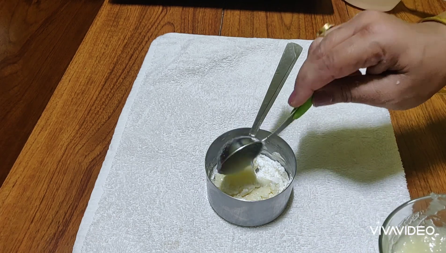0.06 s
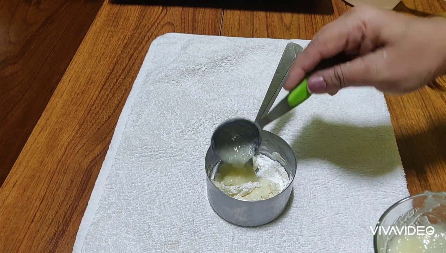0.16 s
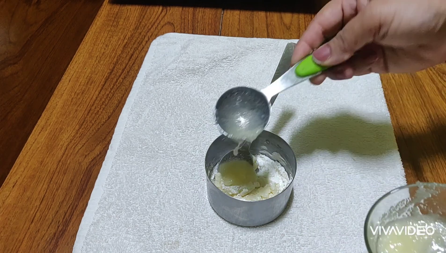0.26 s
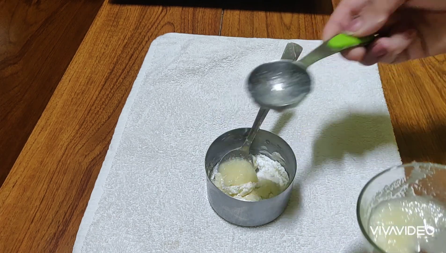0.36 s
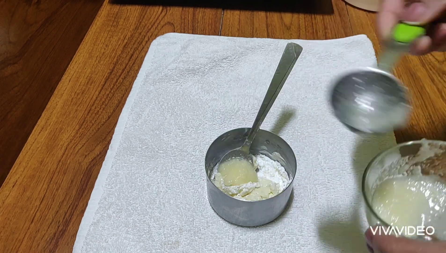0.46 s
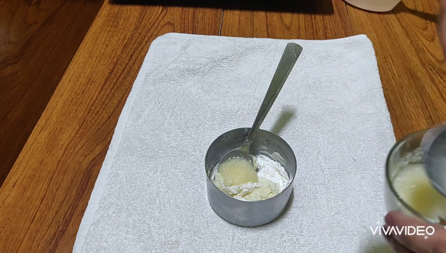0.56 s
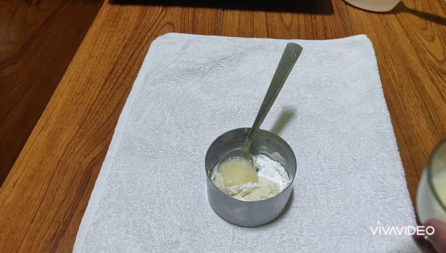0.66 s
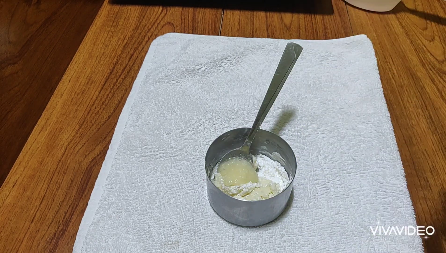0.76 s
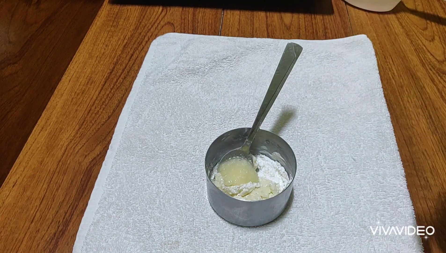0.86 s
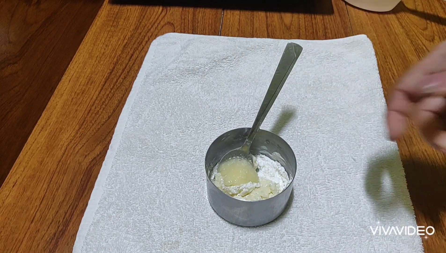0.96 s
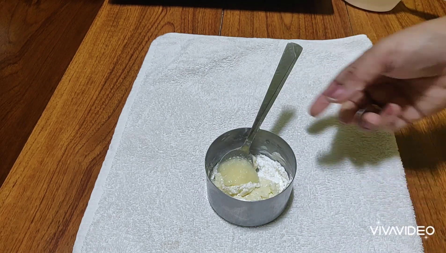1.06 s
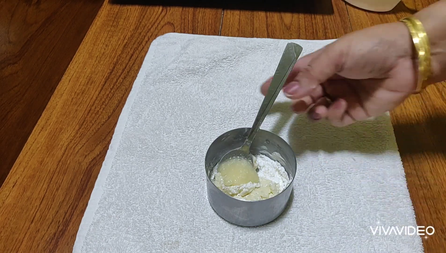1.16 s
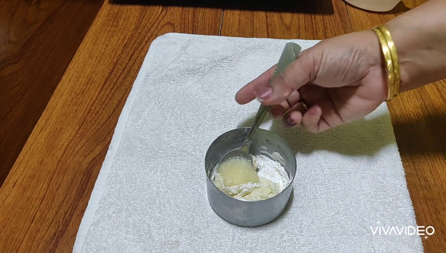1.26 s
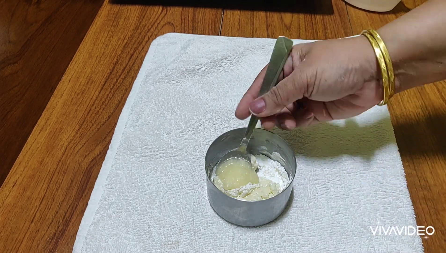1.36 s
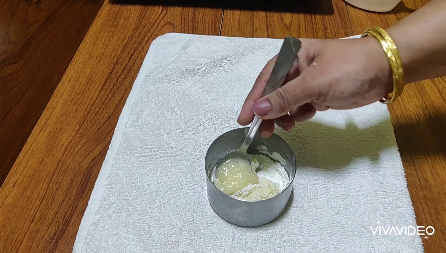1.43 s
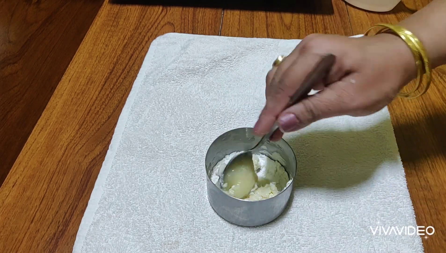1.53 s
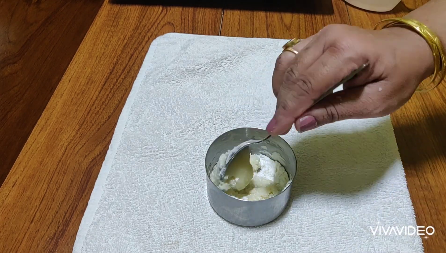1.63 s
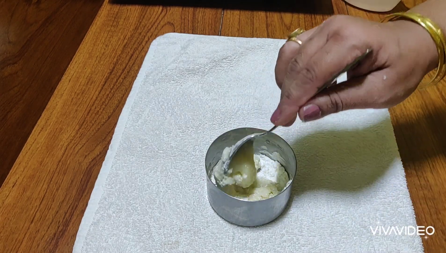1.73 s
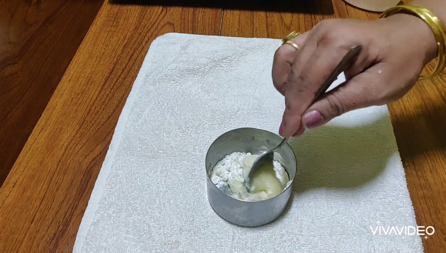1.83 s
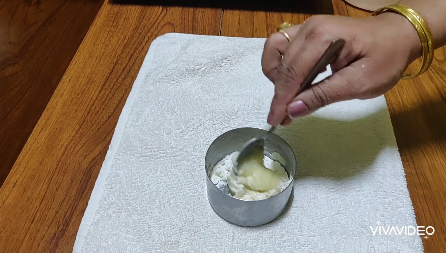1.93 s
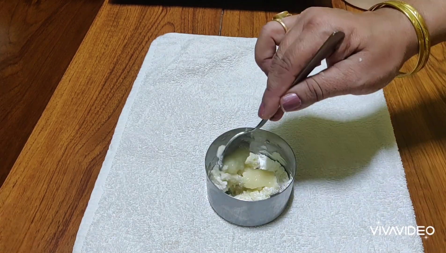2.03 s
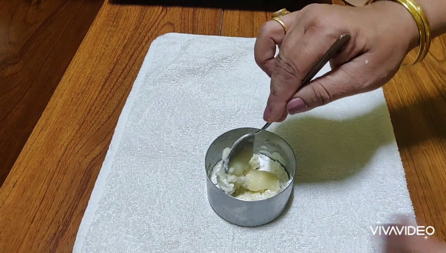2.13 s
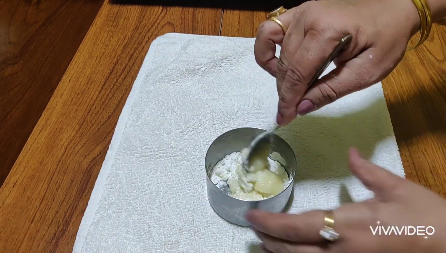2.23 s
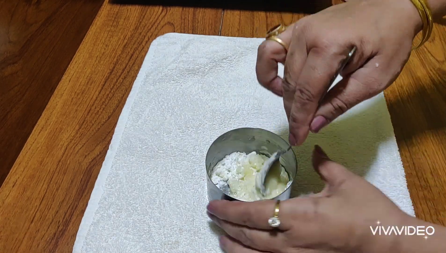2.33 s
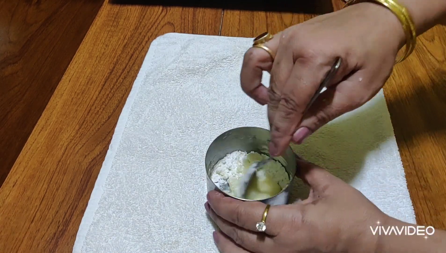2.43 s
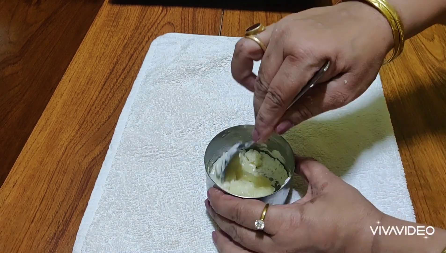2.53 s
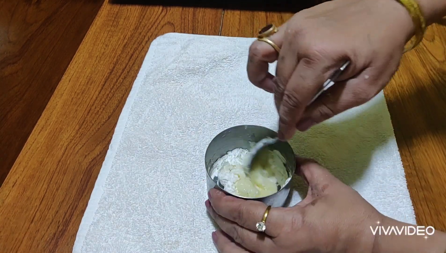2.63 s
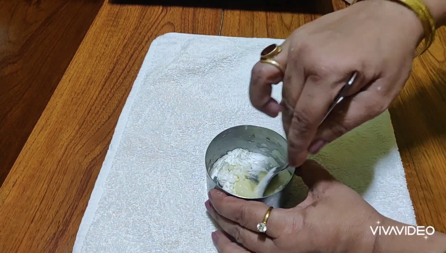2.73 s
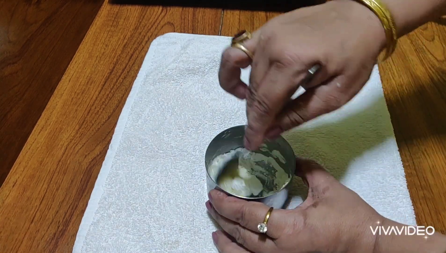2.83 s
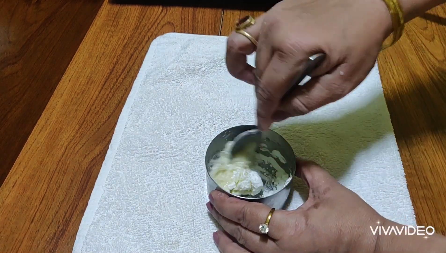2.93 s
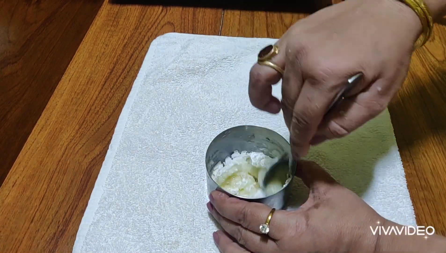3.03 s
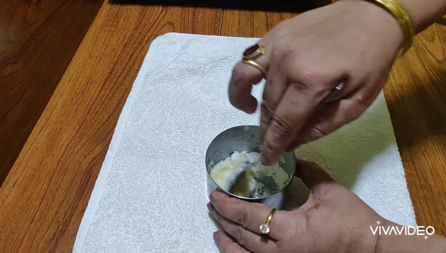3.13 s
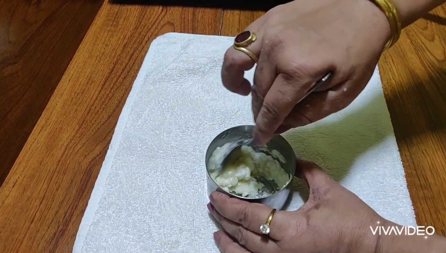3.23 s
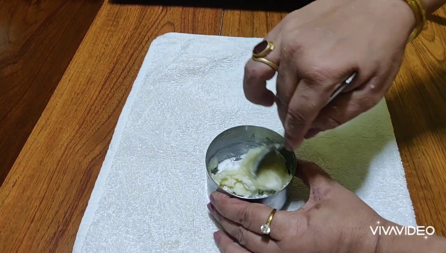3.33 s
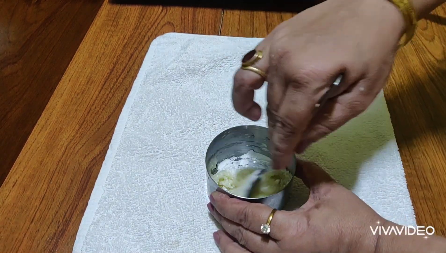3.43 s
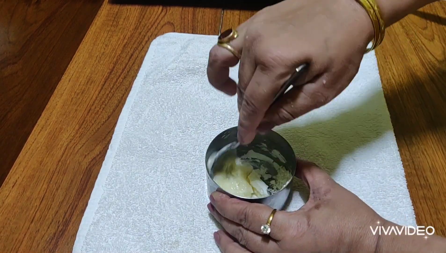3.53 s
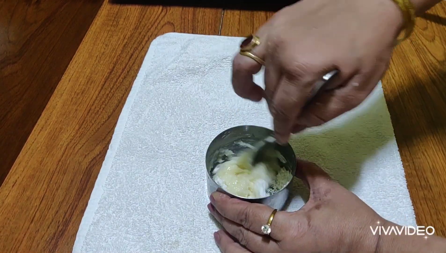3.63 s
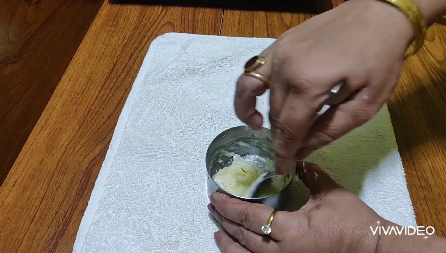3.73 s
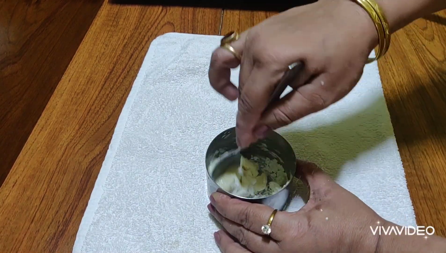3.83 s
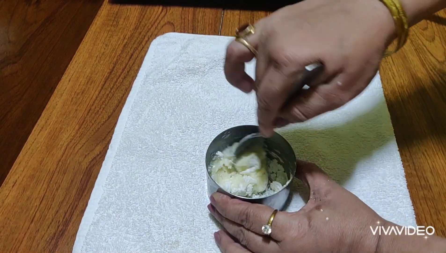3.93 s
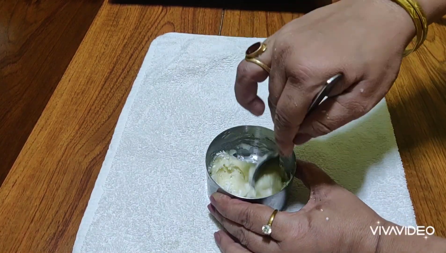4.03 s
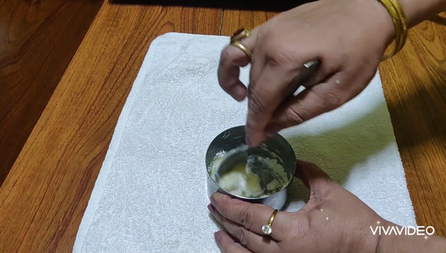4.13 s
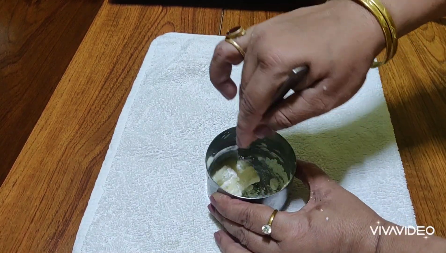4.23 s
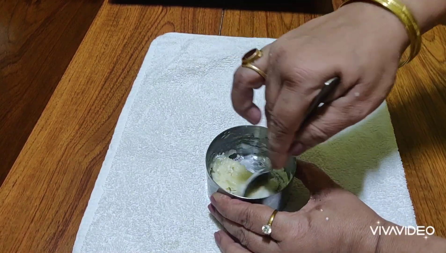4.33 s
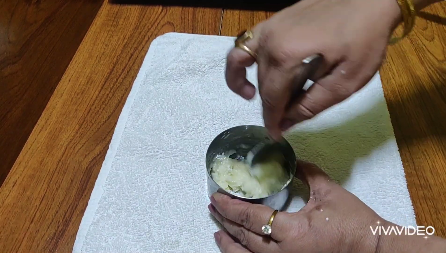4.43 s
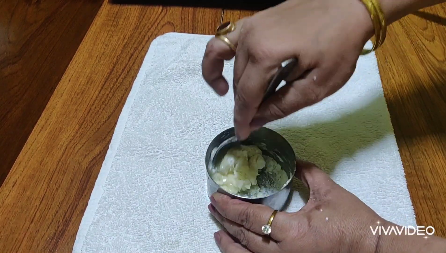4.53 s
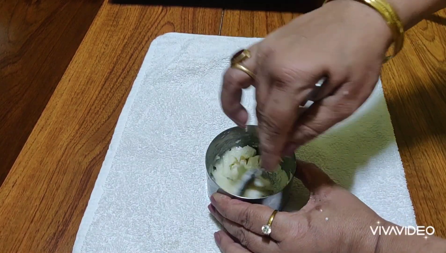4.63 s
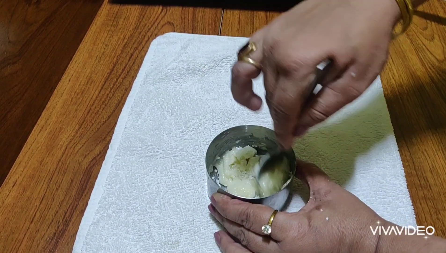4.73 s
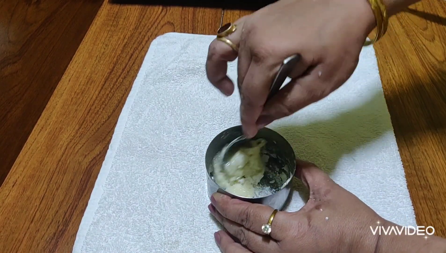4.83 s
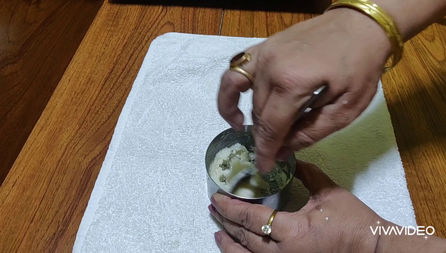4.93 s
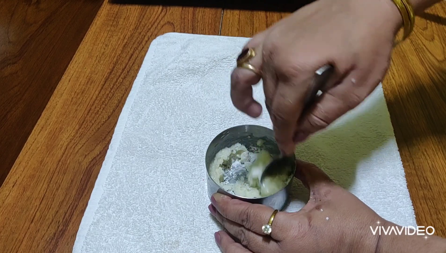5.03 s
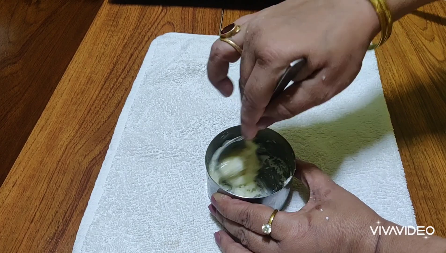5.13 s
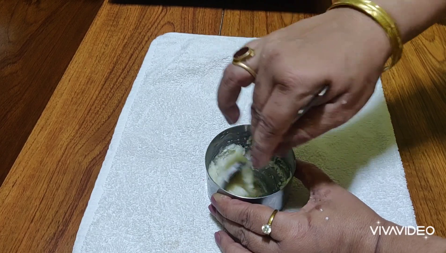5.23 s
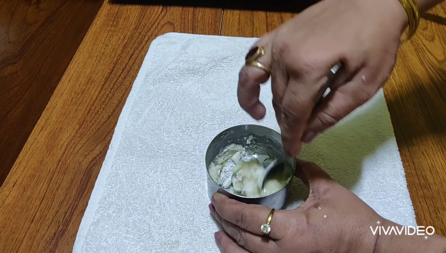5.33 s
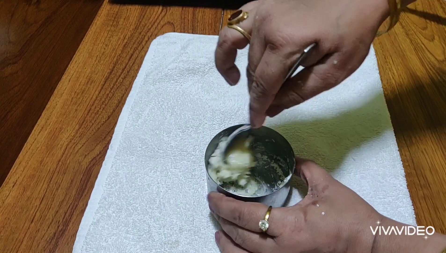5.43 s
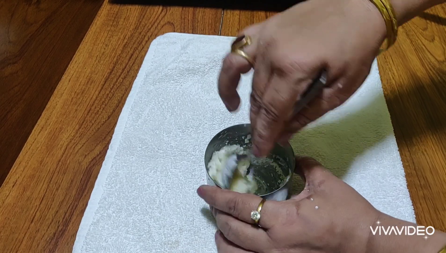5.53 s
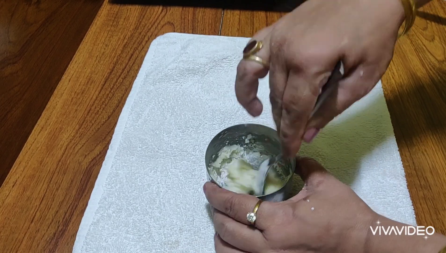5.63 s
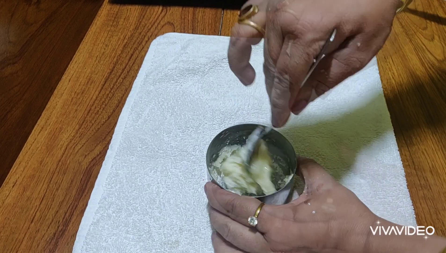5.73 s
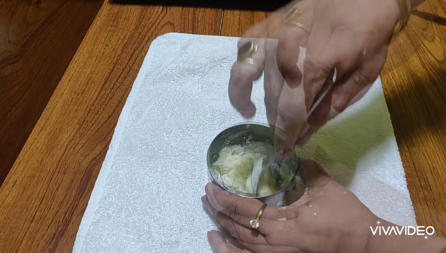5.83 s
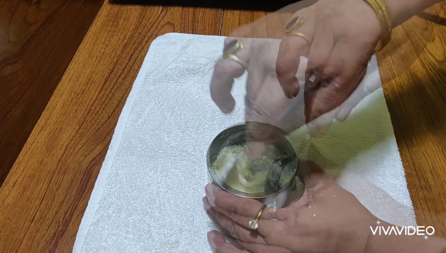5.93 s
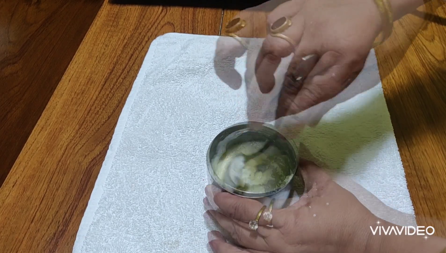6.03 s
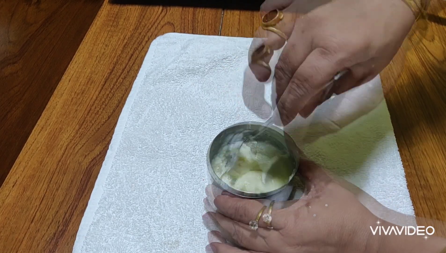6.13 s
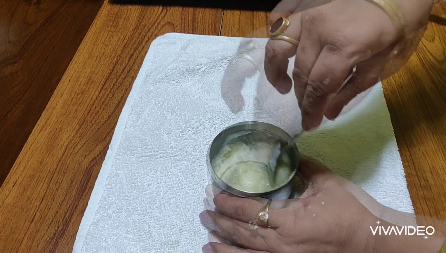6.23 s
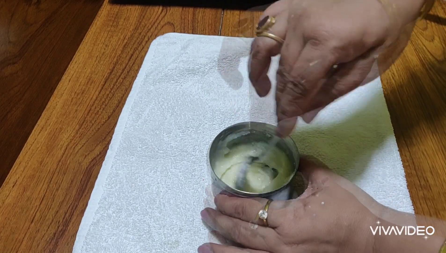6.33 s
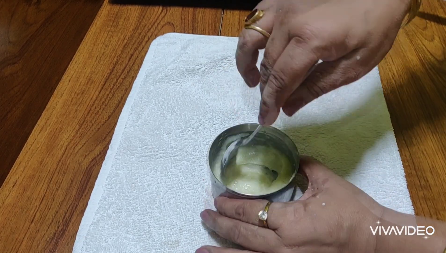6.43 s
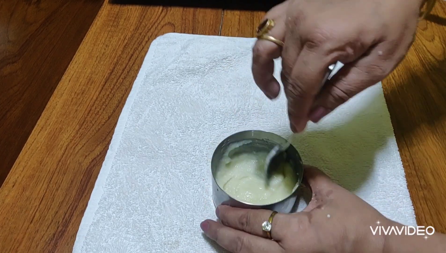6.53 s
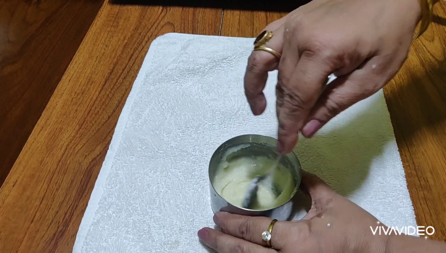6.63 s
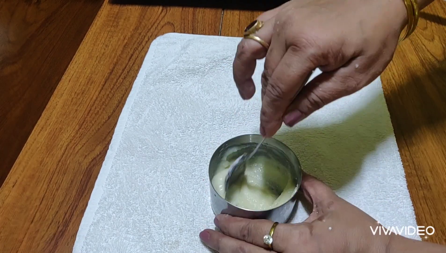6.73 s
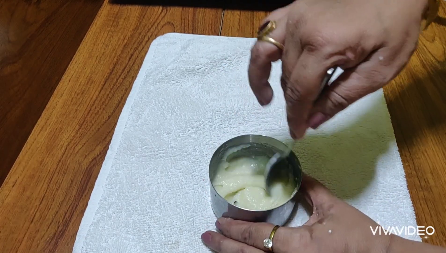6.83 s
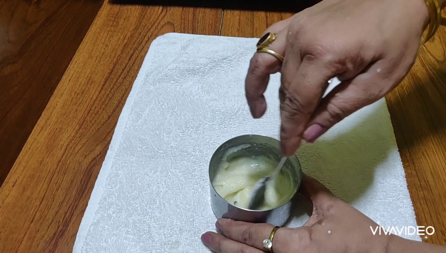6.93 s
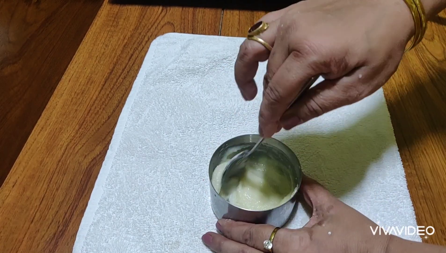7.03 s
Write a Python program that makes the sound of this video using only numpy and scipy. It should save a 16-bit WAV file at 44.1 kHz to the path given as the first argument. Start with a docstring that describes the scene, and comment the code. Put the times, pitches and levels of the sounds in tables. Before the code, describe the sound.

Low appliance hum, a bright glass clink and distant wooden bumps, then quick close spoon knocks and gritty scrapes inside a hand-damped steel bowl.

```python
"""Small, lively kitchen: a steel spoon stirs paste in a small steel bowl, held by hand on a towel on a wooden table.
An appliance and the room hum throughout, as low tones over filtered noise. First, decaying modes make small bright
clinks, a measuring spoon on glass and then probably bangles, and wooden modes thud across the room. Then, close to
the two-port microphone, the spoon knocks and scrapes round the damped bowl about three times a second: blows ring
steel, wall, rim, table and room, random slips scrape, short tones squeak and pop, and shaped noise rubs softly."""
import sys
import numpy as np
from scipy import signal
from scipy.fft import rfft, irfft, next_fast_len
from scipy.io import wavfile
from scipy.ndimage import map_coordinates

SR = 44100
rng = np.random.default_rng(int(sys.argv[2]) if len(sys.argv) > 2 else 0)


def dump_mix(stems):
    """Bounce the given channels to the path in sys.argv[1] as a 16-bit WAV at rate SR."""
    frames = np.atleast_2d(stems).T  # one column per channel
    limited = np.clip(frames, -1, 1)  # hard clip at full scale
    pcm = np.round(limited * 32767).astype(np.int16)
    wavfile.write(sys.argv[1], SR, pcm)


N = 311346


def amp(db):
    """Decibels to gain."""
    return 10 ** (np.asarray(db) / 20)


def unit(x):
    """Scale to rms 1."""
    return x / np.sqrt(np.mean(x ** 2) + 1e-20)


def along(points, hz):
    """(frequency, value) points read on a log frequency axis."""
    f, v = np.transpose(points)
    return np.interp(np.log(hz + 1), np.log(f + 1), v)


def wobble(rate, size=N):
    """A smooth random curve, rate knots a second."""
    knots = rng.standard_normal(int(size * rate / SR) + 4)
    return map_coordinates(knots, [np.arange(size) * rate / SR])


def filtered(x, response):
    """x times a response of frequency."""
    n = x.shape[-1]
    m = next_fast_len(n + SR // 4)
    return irfft(rfft(x, m) * response(np.fft.rfftfreq(m, 1 / SR)), m)[..., :n]


def coloured(x, points):
    """x shaped by this spectrum, rms 1."""
    return unit(filtered(x, lambda hz: amp(along(points, hz))))


def impulse(points, size=4096):
    """The causal (minimum-phase) pulse that has this spectrum, peak 1."""
    cepstrum = irfft(np.log(amp(along(points, np.fft.rfftfreq(size, 1 / SR)))))
    cepstrum[1:size // 2] *= 2
    cepstrum[size // 2 + 1:] = 0
    pulse = irfft(np.exp(rfft(cepstrum)))
    return pulse / np.abs(pulse).max()


def add(track, s, sound):
    """Mix a sound into the track at time s."""
    start = max(round(s * SR), 0)
    part = sound[..., :max(N - start, 0)]
    track[:, start:start + part.shape[-1]] += part


def ring(modes, t, detune, scatter_db, spread, attack):
    """Stereo ring, mid peak 1; every call gives the modes new strengths, pitches and directions."""
    hz, db, t60 = np.transpose(modes)[:, :, None]
    pitch, size, turn = rng.standard_normal((3, len(modes), 1))
    decay = amp(db + scatter_db * size - 60 * t / t60) * (1 - np.exp(-t / attack))
    phase = 2 * np.pi * hz * (1 + detune * pitch) * t
    pair = np.array([(decay * np.sin(phase + side * spread * turn)).sum(0) for side in (1, -1)])
    return pair / np.abs(pair.mean(0)).max()


def slips(t, rate, uneven_db):
    """Stick and slip: jolts at random moments, of uneven size and either sign."""
    chance, size = rng.random(len(t)), rng.standard_normal(len(t))
    return (chance < rate / SR) * amp(uneven_db * size) * np.sign(rng.standard_normal(len(t)))


def nearby(size, apart):
    """Noise from one near spot: one part reaches both ports, one part differs."""
    return unit(rng.standard_normal(size) + apart * rng.standard_normal((2, size)))


# how alike room sound is at the two ports: (frequency [Hz], left-right likeness [0-1])
PORT_LIKENESS = [(100, 0.9), (200, 1), (350, 0.11), (700, 0.037), (2000, 0.056), (8000, 0.039)]


def diffuse(size):
    """Noise from all sides: alike at both ports in the bass, nearly unrelated in the treble."""
    def mid_and_side(hz):
        turn = np.arccos(np.clip(along(PORT_LIKENESS, hz), -1, 1)) / 2
        return np.array([np.cos(turn), np.sin(turn)])
    mid, side = filtered(rng.standard_normal((2, size)), mid_and_side)
    return np.array([mid + side, mid - side])


# how long the kitchen rings: (frequency [Hz], t60 [s])
KITCHEN_DECAY = [(100, 0.96), (400, 0.78), (1200, 0.58), (3000, 0.52), (6500, 0.47), (10000, 0.38)]


def room(x, wet_db, rise):
    """Add the kitchen's answer, a decaying diffuse tail drawn afresh for each third of a second."""
    out, step = x.copy(), SR // 3
    for start in range(0, N, step):
        part = x[:, start:start + step]
        if part.any():
            hz, t, z = signal.stft(diffuse(2 * step), SR, nperseg=256)
            decay = amp(-60 * t / along(KITCHEN_DECAY, hz)[:, None]) * (1 - np.exp(-t / rise))
            tail = signal.istft(z * decay, SR, nperseg=256)[1]
            tail = amp(wet_db) * tail / np.linalg.norm(tail[0])
            add(out, start / SR, signal.fftconvolve(part, tail, axes=1))
    return out


# low hum, many tones at the room's own resonances: (frequency [Hz], level [dB])
HUM_TONES = [(45.8, -53), (110.5, -56.5), (166.9, -48), (236.9, -47.5), (333.8, -57.5), (436.0, -60),
             (486.2, -46.5), (532.9, -57), (748.3, -66)]
# the low rumble: (frequency [Hz], level [dB])
RUMBLE_COLOUR = [(32, -11), (45, 4), (66, -13.5), (108, -7), (130, -9.5), (163, -3), (200, -7.5),
                 (238, -0.5), (275, -12), (335, -13.5), (410, -17), (488, -13.5), (900, -25), (2000, -62)]
# the rush of air, also the colour of smeared paste: (frequency [Hz], level [dB])
HISS_COLOUR = [(500, 2.5), (900, 0), (1300, 0.5), (1750, -2.5), (2150, 2.5), (2700, -7), (4200, -6.5),
               (5600, -6), (6700, -5), (8000, -9), (9500, -10.5), (11500, -9.5)]
# the hiss rises over the first two seconds, then eases slightly: (time [s], level [dB])
HISS_LEVEL = [(0, -2), (2, 0.5), (2.6, -0.5)]
RUMBLE_DB, HISS_DB = -43, -53.5
HUM_DRIFT = 0.79  # scale of the random phase wander [rad]


def appliance():
    """Low hum of slightly unsteady tones, many at the room's own resonances, over rumble and a rush of air."""
    t, hum = np.arange(N) / SR, 0
    for hz, db in HUM_TONES:
        level = amp(db + 0.21 * wobble(3.9))
        hum = hum + level * np.sin(2 * np.pi * hz * t + HUM_DRIFT * wobble(2.514))
    rumble = amp(RUMBLE_DB) * coloured(diffuse(N), RUMBLE_COLOUR)
    hiss = amp(HISS_DB + np.interp(t, *np.transpose(HISS_LEVEL))) * coloured(diffuse(N), HISS_COLOUR)
    return hum + rumble + hiss


# small bright clinks, a measuring spoon on glass, then probably bangles at 1.2 s:
# (time [s], tick level [dB], clatter pitch [Hz], clatter re the tick [dB],
# clatter t60 [s], low knock level [dB], after-ring level [dB])
CLINK_EVENTS = [(0.056, -50, 6500, -3, .01, -75, -82), (0.2152, -45, 6900, -8, 0.015, -70, -79),
                (0.7831, -14.5, 2700, -21, 0.03, -35.5, -40.5), (0.829, -40.5, 5750, 3.5, 0.034, -60, -74),
                (0.9371, -28, 4800, 5, 0.014, -30, -62), (0.953, -26.5, 4760, 3.5, 0.023, -38, -58),
                (0.9549, -29.5, 5550, 7, 0.012, -38.5, -61), (0.9619, -32.5, 9340, 14, 0.01, -45, -64),
                (0.984, -41, 4700, 3, .009, -51, -70), (1.203, -38.5, 8150, 7.5, 0.041, -72, -74),
                (1.213, -46, 5300, 1, .02, -72, -75), (1.43, -48, 2300, 0, 0.046, -72, -80)]
# the tick, as of a measuring spoon on glass: (frequency [Hz], level [dB], t60 [s])
TICK_MODES = [(1290, -4, 0.011), (2000, 0, 0.0072), (2604, -7.5, 0.027), (3460, -8, .008), (5470, -7, 0.01),
              (7130, 0.5, 0.016), (7900, -2.5, 0.0085), (8560, -3.5, 0.021), (9160, 0, 0.027)]
# close partials round a clink's pitch: (frequency ratio, level [dB])
CLATTER_PARTIALS = [(0.946, -1.5), (1, 4), (1.07, -6.5), (1.17, -5.5)]
# the low knock, as of the glass on the table: (frequency [Hz], level [dB], t60 [s])
LOW_KNOCK_MODES = [(500, -9, 0.025), (780, 2, 0.014)]
# the after-ring, as of the measuring spoon: (frequency [Hz], level [dB], t60 [s])
AFTER_RING_MODES = [(2700, -6, 0.6), (2735, -5, 0.56), (5600, -16, 0.25), (8110, -19, .2),
                    (9290, -16, 0.16)]


def clinks():
    """Small bright clinks: each a tick, a clatter of close partials, a low knock and a thin after-ring."""
    ticks, rings, t = np.zeros((2, N)), np.zeros((2, N)), np.arange(SR // 2) / SR
    short = t[:SR // 12]
    for s, db, hz, clatter_db, t60, knock_db, after_db in CLINK_EVENTS:
        tick = ring(TICK_MODES, short, detune=0.008, scatter_db=2.5, spread=0.8, attack=0.0001)
        crack = 0.28 * amp(-60 * short / 0.025) * rng.standard_normal((2, len(short)))
        partials = [(ratio * hz, level, t60) for ratio, level in CLATTER_PARTIALS]
        clatter = ring(partials, short, detune=.006, scatter_db=1.5, spread=.5, attack=.0002)
        knock = ring(LOW_KNOCK_MODES, short, detune=.04, scatter_db=2, spread=.4, attack=.0012)
        after = ring(AFTER_RING_MODES, t, detune=.0004, scatter_db=1, spread=.4, attack=.004)
        add(ticks, s, amp(db) * (tick + crack + amp(clatter_db) * clatter) + amp(knock_db) * knock)
        add(rings, s, amp(after_db) * after)
    return room(ticks, wet_db=-8.5, rise=0.0031) + room(rings, wet_db=-14, rise=0.0063)


# thuds across the room: (time [s], level [dB])
THUD_EVENTS = [(1.5953, -9), (1.6365, -33), (1.7115, -26.5), (1.7837, -18.5)]
# the landing weight: (frequency [Hz], level [dB])
WEIGHT_COLOUR = [(29, -77), (50, -43), (100, -5), (158, 6), (252, -8.5), (439, -3), (699, -7), (1000, -16),
                 (1900, -30), (3600, -51), (10000, -60), (22000, -120)]
# what thuds: (frequency [Hz], level [dB], t60 [s])
WOOD_MODES = [(325, -2, 0.019), (512, 1, 0.042), (667, 5, 0.03), (884, -4, 0.013), (1215, 4, 0.016),
              (1830, -4.5, 0.014), (2750, -23, .008)]
# the rattle after it: (frequency [Hz], level [dB])
RATTLE_COLOUR = [(100, -28), (200, -12), (450, 7), (650, 5), (850, 0.5), (1400, -6.5), (2400, -12.5),
                 (3400, -20), (6000, -42)]
# the thud's crack: (frequency [Hz], level [dB])
CRACK_COLOUR = [(1000, -27), (3800, -14), (6400, 4.5), (8000, -14), (9300, -0.5), (12000, -38)]
WEIGHT_LAG_S = 0.0017  # the weight lands after the edge
RATTLE_DB, RATTLE_T60_S = -22, 0.4


def thuds():
    """Something heavy and wooden bumps: its edge knocks and cracks, its weight lands, it rattles densely."""
    body, cracks, pulse = np.zeros((2, N)), np.zeros((2, N)), impulse(WEIGHT_COLOUR)
    t = np.arange(SR // 3) / SR
    for s, db in THUD_EVENTS:
        knock = ring(WOOD_MODES, t, detune=.03, scatter_db=1.5, spread=.4, attack=.0001)
        jolts = slips(t, rate=720, uneven_db=1.5)
        rattle = coloured(jolts * nearby(len(t), apart=0.8), RATTLE_COLOUR)
        rattle = amp(RATTLE_DB - 60 * t / RATTLE_T60_S) * rattle
        add(body, s, amp(db) * (rattle - knock))
        add(body, s + WEIGHT_LAG_S, amp(db) * pulse)
        crack = coloured(rng.standard_normal((2, len(t))), CRACK_COLOUR)
        add(cracks, s, amp(db - 22.5 - 60 * t / 0.039) * crack)
    return room(body, wet_db=-1.5, rise=0.0013) + room(cracks, wet_db=-6, rise=0.004)


# skin on towel: (frequency [Hz], level [dB])
TOWEL_COLOUR = [(2000, -10.5), (4900, -8), (6300, -2), (9200, -3), (11000, -13)]
BRUSH_S, BRUSH_WIDTH_S = 2.427, 0.084  # its height, and the time from there to half its amplitude
BRUSH_DB, BRUSH_SWING_DB = -46, 0.6


def brush():
    """Skin slides unevenly over cloth, swelling and fading as the hand closes round the bowl."""
    away = (np.arange(N) / SR - BRUSH_S) / BRUSH_WIDTH_S
    level = amp(BRUSH_DB + BRUSH_SWING_DB * wobble(60)) / (1 + away ** 2)
    return level * coloured(rng.standard_normal((2, N)), TOWEL_COLOUR)


def gripped(modes, detune, scatter_db):
    """The modes as one stroke finds them: damped by pressure, shifted and weighted by where the edge sits."""
    pitch, size = rng.standard_normal((2, len(modes)))
    hz, db, t60 = np.transpose(modes)
    return np.column_stack([hz * (1 + detune * pitch), db + scatter_db * size, t60 * PRESSED_DAMPING])


def shaken(jolts, modes, detune, scatter_db, spread):
    """Jolts through the modes, rms 1; the contact point travels, so the ring is redrawn every 10 ms."""
    step, t = SR // 100, np.arange(SR // 55) / SR
    out = np.zeros((2, len(jolts) + step + len(t)))
    for start in range(0, len(jolts), step):
        body = ring(modes, t, detune, scatter_db, spread, attack=0.00061)
        piece = signal.fftconvolve(jolts[None, start:start + step], unit(body), axes=1)
        out[:, start:start + piece.shape[1]] += piece
    return unit(out[:, :len(jolts)])


# the spoon drags along the wall: (time [s], pressing [s], easing [s], rasp level [dB],
# bite: lift of the lower steel modes re the rasp [dB], wall level [dB])
STROKE_EVENTS = [(2.773, 0.016, 0.017, -35, 0, -39), (2.809, 0.042, 0.0048, -37, -3, -57),
                 (2.852, 0.0027, 0.025, -27, -13, -46), (3.139, 0.059, 0.0051, -25, -3.5, -32.5),
                 (3.447, 0.024, 0.043, -31, -1, -35), (3.497, 0.019, 0.043, -32, -3, -39),
                 (3.774, 0.025, 0.012, -27, -4, -34.5), (3.802, 0.019, 0.048, -23.5, -5.5, -40),
                 (3.87, 0.056, 0.024, -34, -3.5, -44), (4.127, 0.049, 0.0078, -27, -1, -31.5),
                 (4.626, 0.0089, 0.0095, -44.5, -3.5, -48.5), (4.803, 0.0084, 0.045, -32, -8, -42),
                 (4.866, 0.011, 0.034, -41, -7.5, -54), (4.993, 0.029, 0.027, -40, -8, -34),
                 (5.025, 0.019, 0.0073, -33, -9, -41), (5.048, 0.059, 0.042, -25.5, -5.5, -35.5),
                 (5.365, 0.03, 0.0065, -33, -4.5, -43), (5.398, .012, 0.051, -24.5, -5, -34.5),
                 (5.711, 0.0096, .022, -39, -4.5, -42), (6.017, 0.02, 0.0039, -35.5, -3, -39),
                 (6.057, 0.012, 0.03, -36, -6, -47), (6.226, 0.0095, 0.015, -38.5, -12, -47),
                 (6.277, 0.004, 0.027, -34.5, -4.5, -50), (6.566, .016, 0.022, -34.5, -13.5, -52),
                 (6.645, 0.026, 0.025, -40.5, -1, -36), (6.82, 0.032, 0.021, -34.5, -5, -43),
                 (6.989, 0.0069, 0.04, -35, -1.5, -42.5)]
# the bowl, damped by hand and paste: (frequency [Hz], level [dB], t60 [s])
STEEL_MODES = [(1637, -16.5, 0.079), (1720, -7, 0.051), (2020, -4, 0.008), (2420, 4.5, 0.017),
               (2928, 2, 0.027), (3405, 5.5, 0.011), (4120, 3.5, 0.019), (4330, 0, 0.01),
               (4930, -7.5, 0.016), (5265, 9, 0.014), (5750, 4, 0.0077), (5885, 6, 0.019), (6385, 5, 0.015),
               (6480, 4.5, 0.016), (6940, 1.5, 0.024), (7290, -4.5, 0.03), (7700, -3, 0.019),
               (8680, 0.5, 0.0096), (9160, -1, 0.021)]
# the bowl's wall: (frequency [Hz], level [dB], t60 [s])
WALL_MODES = [(850, -4, 0.003), (1142, 4.5, 0.022), (1330, -5.5, 0.033), (1940, -3, 0.0077)]
# crushed grit: (frequency [Hz], level [dB])
GRIT_COLOUR = [(500, -50), (1000, -5), (1600, 3.5), (2400, 12.5), (3300, 5), (4400, 4.5), (5300, -9),
               (6400, 5), (7200, 3), (8200, -3), (9400, 0.5), (12000, -45)]
PRESS_DB, EASE_DB, TOUCH_S = 10, 8, 0.0044  # a stroke swells, then sinks; its edge lands and lifts in this time
BITE_FOLLOWS, WALL_FOLLOWS = 0.91, 0.51  # share of the swell in lower modes and wall: harder is brighter
CATCH_DB, CATCH_RATE = 2.2, 220  # the edge's unsteadiness: scale, and knots a second
SLIP_RATE, GRIT_DB = 2400, -3  # mean slips a second; grit re the steel's ring
PRESSED_DAMPING = 0.68  # share of the ring time left under pressure


def scrapes():
    """Each stroke presses, then eases; the edge's slips ring the damped steel and wall and crush grit."""
    out, crush = np.zeros((2, N)), amp(-60 * np.arange(SR // 100) / SR / 0.0016)
    for s, press_s, ease_s, rasp_db, bite_db, wall_db in STROKE_EVENTS:
        t = np.arange(0, press_s + ease_s + TOUCH_S, 1 / SR)
        force_db = np.interp(t, [0, press_s, press_s + ease_s], [-PRESS_DB, 0, -EASE_DB])
        contact = np.clip(np.minimum(t, t[-1] - t) / TOUCH_S, 0, 1)
        force_db = force_db + CATCH_DB * wobble(CATCH_RATE, size=len(t))  # the edge catches and frees itself
        jolts = slips(t, rate=SLIP_RATE, uneven_db=4)
        pressed = gripped(STEEL_MODES, detune=.035, scatter_db=1.5)
        steel = shaken(jolts, pressed, detune=.07, scatter_db=3.5, spread=.7)
        crushing = np.convolve(np.abs(jolts), crush)[:len(t)]
        steel += amp(GRIT_DB) * coloured(crushing * nearby(len(t), apart=0.5), GRIT_COLOUR)
        lower = filtered(steel, lambda hz: 1 / (1 + (hz / 4200) ** 8))
        rasp = amp(force_db) * unit(steel - lower)
        bite = amp(bite_db + BITE_FOLLOWS * force_db) * unit(lower)
        wall = shaken(jolts, WALL_MODES, detune=0.12, scatter_db=5, spread=0.7)
        wall = amp(wall_db + WALL_FOLLOWS * force_db) * wall
        add(out, s, contact * (amp(rasp_db) * (rasp + bite) + wall))
    return out


# spoon meets bowl: (time [s], steel clack level [dB], dull wall knock level [dB], wall pitch [Hz],
# low thump level [dB])
TAP_EVENTS = [(2.7804, -28.5, -26, 1310, -36), (2.859, -15, -51, 1430, -57),
              (3.1315, -14, -10.5, 1020, -25.5), (3.162, -32, -22.5, 1222, -41),
              (3.1958, -22, -37, 1060, -30), (3.7715, -32, -25, 1040, -32.5),
              (4.108, -28.5, -11.5, 1055, -21.5), (4.172, -36, -26, 1080, -33),
              (4.700, -36, -13.5, 1118, -22.5), (4.7282, -30.5, -25, 1183, -55),
              (4.811, -29, -49, 1360, -27), (4.992, -28.5, -25, 1270, -31), (5.016, -28, -23.5, 1377, -46),
              (5.046, -18.5, -17, 1474, -53), (5.0901, -25, -24.5, 1400, -37),
              (5.3367, -31.5, -30, 1042, -25.5), (5.3555, -25, -22, 1314, -30),
              (5.4053, -15, -31, 1571, -48), (5.436, -21, -25, 1220, -57), (5.7068, -35, -9.5, 1090, -30.5),
              (6.0085, -19, -12.5, 1310, -28.5), (6.2227, -22.5, -31.5, 1937, -43),
              (6.274, -19.5, -16, 1104, -32), (6.31, -23.5, -30, 1759, -57),
              (6.5595, -34, -26.5, 1041, -38), (6.6141, -6.5, -11.5, 1680, -36),
              (6.6606, -40, -24, 1502, -51), (6.673, -26.5, -41, 1361, -53),
              (6.8228, -37, -23.5, 1460, -61), (6.9916, -28, -28, 940, -37)]
REBOUND_S, REBOUND_DB = 0.0024, -1  # the edge chatters once as it lands


def clacks():
    """Bare steel on steel: a crack and a very short, dense ring, struck again as the edge rebounds."""
    out, t = np.zeros((2, N)), np.arange(SR // 20) / SR
    for s, clack_db, *_ in TAP_EVENTS:
        for lag, db in [(0, clack_db), (REBOUND_S, clack_db + REBOUND_DB)]:
            steel = ring(STEEL_MODES, t, detune=.012, scatter_db=2, spread=.6, attack=.0004)
            crack = 0.21 * amp(-60 * t / 0.039) * rng.standard_normal((2, len(t)))
            add(out, s + lag, amp(db) * (steel + crack))
    return out


# hard surfaces close by answer a knock: (delay [s], level [dB])
NEAR_ECHOES = [(0.0117, -11.5), (0.0163, -22)]
SMOTHER_S, WALL_LOW_HZ = .0042, 670  # paste smothers the wall; the small wall radiates little below this


def knocks():
    """A blow cushioned by paste knocks the wall for a few cycles; surfaces close by throw it back."""
    out, t = np.zeros((2, N)), np.arange(SR // 20) / SR
    thin = signal.butter(3, WALL_LOW_HZ, "high", fs=SR, output="sos")
    for s, _, knock_db, wall_hz, _ in TAP_EVENTS:
        stiffness = wall_hz / WALL_MODES[1][0]  # the wall sounds higher where it is struck near the base
        wall = ring(WALL_MODES, t * stiffness, detune=0.02, scatter_db=1.5, spread=0.42, attack=0.00062)
        smothered = wall / (1 + (t / SMOTHER_S) ** 4)
        knock = amp(knock_db) * signal.sosfilt(thin, smothered)
        add(out, s, knock)
        for delay, echo_db in NEAR_ECHOES:
            add(out, s + delay, amp(echo_db) * knock)
    return out


# the bowl's rim: (frequency [Hz], level [dB], t60 [s])
RIM_MODES = [(1060, 7, 0.33), (1070, -11, 0.8), (1220, -2.5, 0.34), (1330, -13, 0.13), (1530, 5, 0.25)]
RIM_DB, RIM_MUTE_DB = -24.5, 15  # after-ring re the knock; the most that bare steel against it takes away
RIM_FOCUS_DB = 25  # loss per octave from the wall's pitch
RIM_SAG, RIM_SAG_S = 0.033, 0.029  # starts sharp by this share, settling with this time constant
GRIP_MUTE_DB = 4.5  # what the hand's grip takes from the rim, except while it loosens
LOOSE_FROM_S, LOOSE_TO_S = 5.5, 5.9


def rim():
    """The rim sings on near the knock's pitch, sagging as the spoon eases off; bare steel and hand mute it."""
    out, t = np.zeros((2, N)), np.arange(SR // 2) / SR
    settling = t + RIM_SAG * RIM_SAG_S * (1 - np.exp(-t / RIM_SAG_S))
    for s, clack_db, knock_db, wall_hz, _ in TAP_EVENTS:
        song = 0
        for hz, db, t60 in RIM_MODES:
            mode_db = db - RIM_FOCUS_DB * abs(np.log2(hz / wall_hz)) - 60 * t / t60
            song = song + amp(mode_db) * np.sin(2 * np.pi * hz * settling)
        bare = amp(clack_db) / (amp(clack_db) + amp(knock_db))
        held = not LOOSE_FROM_S < s < LOOSE_TO_S
        add(out, s, amp(knock_db + RIM_DB - RIM_MUTE_DB * bare - GRIP_MUTE_DB * held) * song)
    return out


# a short table ring near 86 Hz and a longer room resonance near 111 Hz: (frequency [Hz], level [dB], t60 [s])
THUMP_MODES = [(86, 8, 0.16), (103.5, -14, 0.45), (111.8, -3.5, 1)]


def thumps():
    """The low thump of each tap: a short table ring near 86 Hz and a longer room resonance near 111 Hz."""
    out, t = np.zeros((2, N)), np.arange(2 * SR // 3) / SR
    for s, *_, thump_db in TAP_EVENTS:
        thump = ring(THUMP_MODES, t, detune=.008, scatter_db=1.5, spread=.03, attack=.0025)
        add(out, s, amp(thump_db) * thump)
    return out


# paste smears under the spoon: (time [s], length [s], level [dB])
SMEAR_EVENTS = [(2.8, 2.9, -53), (6.0, 1.2, -52.5)]
# the bowl shifts on the towel: (time [s], length [s], level [dB])
SHIFT_EVENTS = [(3.62, 0.3876, -46), (6.5, 0.7, -43.5)]
# the bowl's base on cloth: (frequency [Hz], level [dB])
CLOTH_COLOUR = [(100, -6), (220, -17), (330, -3), (600, -6.5), (900, -19.5), (2000, -17.5), (5000, -39)]
RUB_FADE_S, RUB_SWING_DB = 0.067, 1  # fade in and out; scale of the wavering


def rubbing(rows, colour):
    """A soft, uneven rustle for each row: wet paste on steel, or the bowl's base on cloth."""
    t, level = np.arange(N) / SR, 0
    for s, length, db in rows:
        level = level + amp(db) * np.clip(np.minimum(t - s, s + length - t) / RUB_FADE_S, 0, 1)
    return level * amp(RUB_SWING_DB * wobble(6)) * coloured(diffuse(N), colour)


# the edge chatters on one resonance: (time [s], length [s], pitch [Hz], level [dB])
SQUEAK_EVENTS = [(2.853, 0.017, 5340, -28), (3.187, 0.018, 6804, -28), (3.818, 0.029, 6150, -28.5),
                 (4.16, 0.022, 4404, -28), (5.065, 0.016, 6200, -36), (5.081, 0.026, 4240, -29),
                 (5.107, 0.044, 5180, -35.5), (6.992, .022, 5850, -31)]
SQUEAK_RISE, SQUEAK_WAVER = 0.037, 0.034  # shares of the pitch: its rise, and the scale of its unsteadiness


def squeaks():
    """For a moment the slips lock onto one steel resonance: a rough, rising chirp."""
    out = np.zeros((2, N))
    for s, length, hz, db in SQUEAK_EVENTS:
        u = np.arange(0, 1, 1 / (length * SR))
        pitch = hz * (1 + SQUEAK_RISE * (u - .5) + SQUEAK_WAVER * wobble(900, size=len(u)))
        roughness = amp(5.5 * wobble(600, size=len(u)))
        tone = np.sin(2 * np.pi * np.cumsum(pitch) / SR) * roughness
        add(out, s, amp(db) * np.sin(np.pi * u) * tone)
    return out


# sticky paste lets go with a small pop: (time [s], peak level [dB], pitch [Hz])
POP_EVENTS = [(2.962, -37, 7040), (3.09, -42, 5200), (3.664, -27.5, 6908), (3.7097, -26.5, 6658),
              (4.422, -33, 6537), (4.433, -31, 6980), (4.671, -21.5, 6360), (4.733, -26, 5790),
              (4.771, -30, 3010), (4.90, -27, 6846)]


def pops():
    """Each small cavity in the paste rings briefly as it tears open."""
    out, t = np.zeros((2, N)), np.arange(SR // 40) / SR
    for s, db, hz in POP_EVENTS:
        cavity = [(0.756 * hz, -5, .006), (hz, 0, .009), (1.4 * hz, -5, .005)]
        add(out, s, amp(db) * ring(cavity, t, detune=.02, scatter_db=3, spread=.6, attack=.0003))
    return out


def scene():
    """Far thuds and close stirring fill the kitchen; rim, thumps, rustle and hum get no added tail."""
    before = appliance() + clinks() + thuds()
    strokes = room(scrapes() + squeaks() + pops(), wet_db=-6.5, rise=0.00072)
    blows = room(clacks(), wet_db=-8, rise=0.001) + room(knocks(), wet_db=-9, rise=0.0016) + rim()
    rustle = brush() + rubbing(SMEAR_EVENTS, HISS_COLOUR) + rubbing(SHIFT_EVENTS, CLOTH_COLOUR)
    return before + strokes + blows + thumps() + rustle


# balance of the two ports: (frequency [Hz], left minus right [dB])
PORT_BALANCE = [(60, 1), (200, 2.5), (600, 2), (1200, 2.5), (2600, 2), (4200, 2.5), (6300, 11), (7400, 7),
                (8300, -8.5), (9400, -15), (11000, 6)]
# the microphone's response: (frequency [Hz], level [dB])
MICROPHONE_COLOUR = [(30, -4), (1000, -2.5), (3000, -3.5), (6000, -2.5), (8000, -4.5), (9500, -7),
                     (10300, -15), (11800, -31)]
TOP_HZ = 11900  # band limit


def record(dry):
    """The left port favours the presence range, the right one about 8 to 10 kHz; a band limit cuts the top."""
    def response(hz):
        ports = amp(along(PORT_BALANCE, hz) * np.array([[.5], [-.5]]))
        balance = ports / ports.mean(0)
        return balance * amp(along(MICROPHONE_COLOUR, hz)) * (hz < TOP_HZ)
    return filtered(dry, response)


dry = scene()
out = record(dry)
dump_mix(out)
```